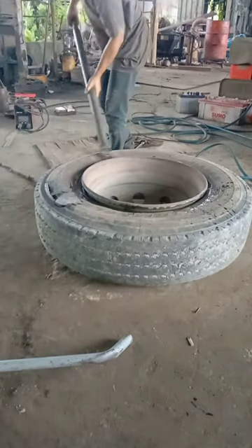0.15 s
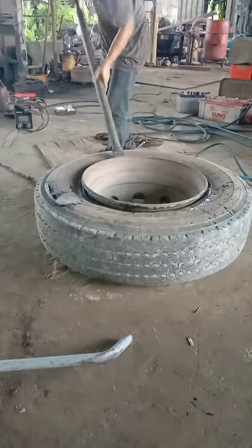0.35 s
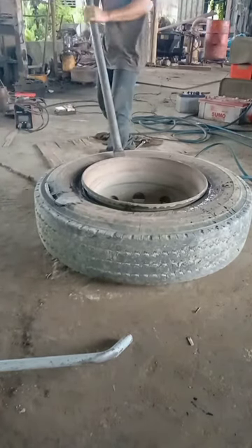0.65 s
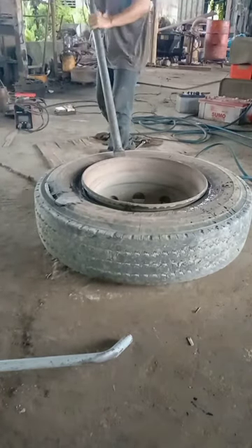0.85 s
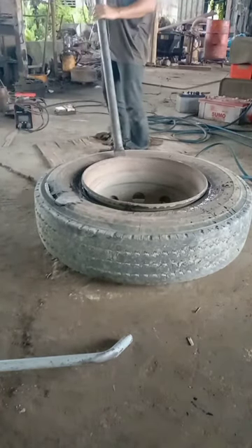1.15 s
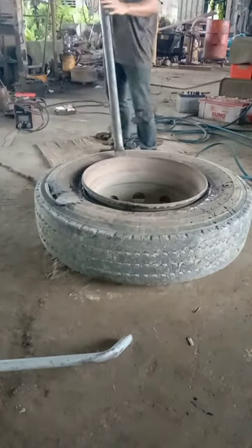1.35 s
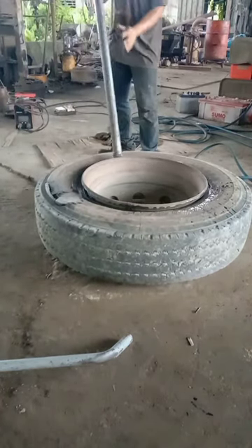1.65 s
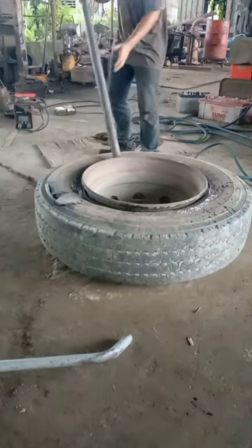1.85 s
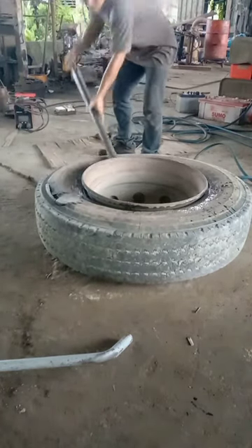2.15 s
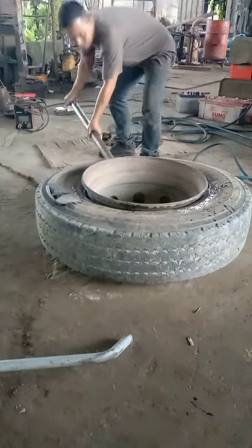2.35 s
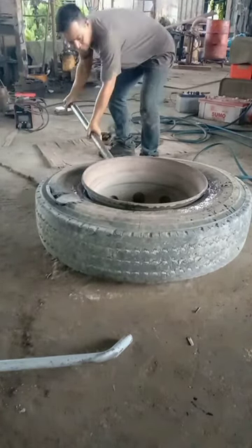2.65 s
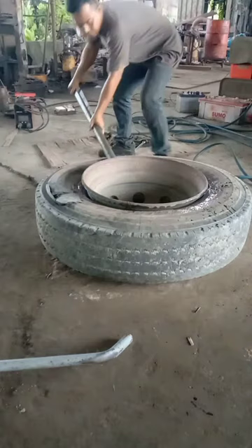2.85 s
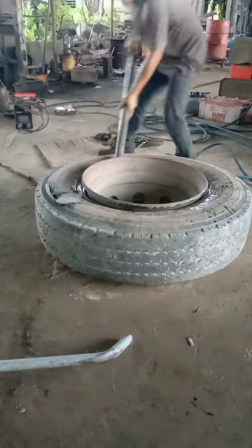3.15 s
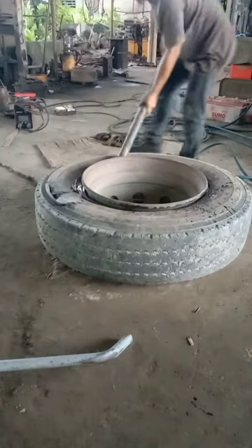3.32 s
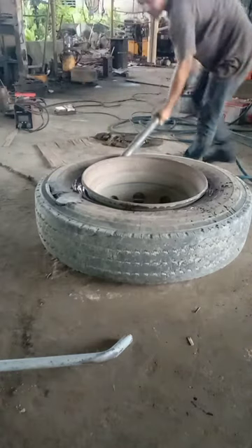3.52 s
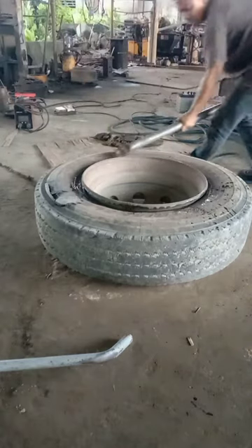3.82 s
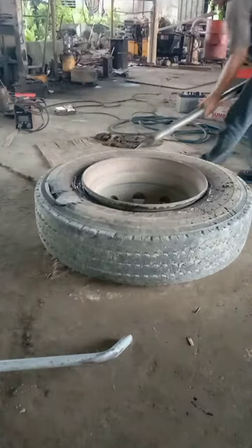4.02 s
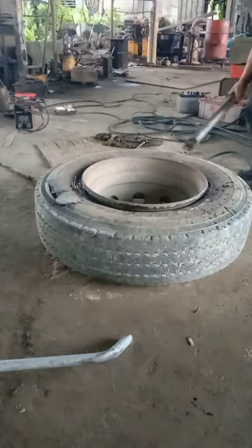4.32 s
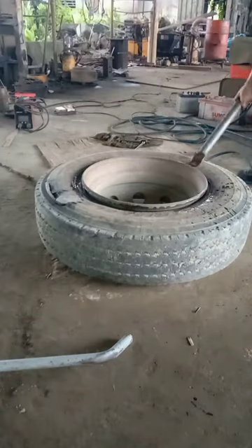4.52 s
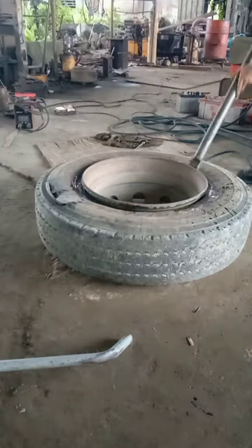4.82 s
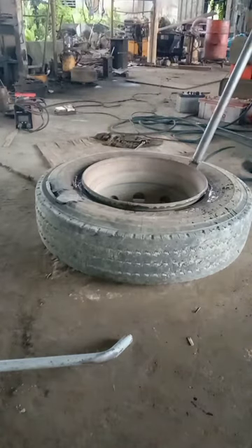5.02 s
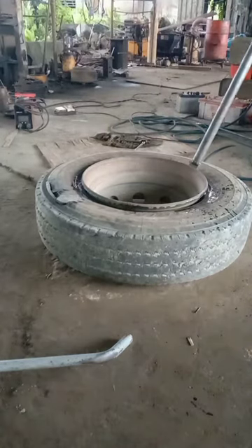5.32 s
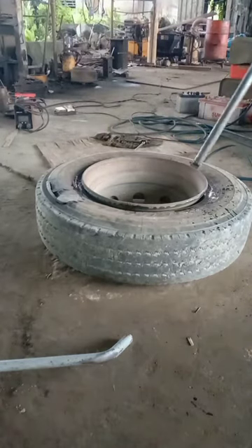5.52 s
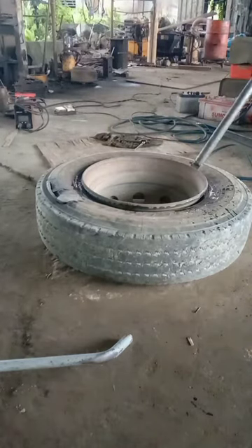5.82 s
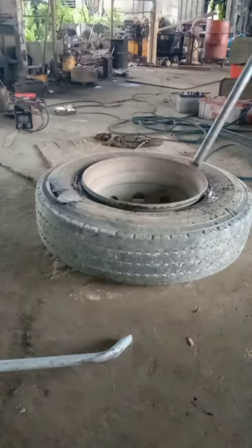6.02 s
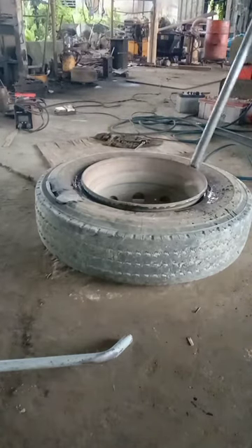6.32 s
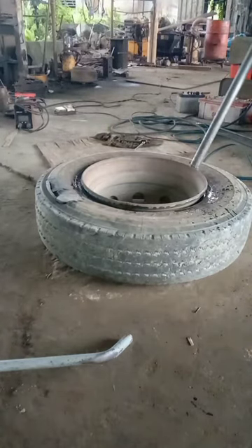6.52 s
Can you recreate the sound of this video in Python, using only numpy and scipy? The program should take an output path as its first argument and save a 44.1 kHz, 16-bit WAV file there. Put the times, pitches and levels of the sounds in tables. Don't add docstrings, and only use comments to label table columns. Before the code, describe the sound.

Spaced hard clangs of a steel lever on a wheel rim, rubber thumps beneath, faint insects and distant bird chirps between the blows.

```python
import sys
import numpy as np
from scipy import signal
from scipy.fft import rfft, irfft, next_fast_len
from scipy.io import wavfile
from scipy.ndimage import uniform_filter1d

SR = 44100
rng = np.random.default_rng(int(sys.argv[2]) if len(sys.argv) > 2 else 0)


def gain_from_decibels(decibels):
    exponent = np.asarray(decibels, float) / 20
    return 10 ** exponent


def master_out(mix):
    frames = np.transpose(np.atleast_2d(mix))
    ceiling = np.clip(frames, -1, 1)
    pcm = np.round(ceiling * 32767).astype(np.int16)
    wavfile.write(sys.argv[1], SR, pcm)


N = 294129
LONG = SR * 2 // 3


def unit(x):
    return x / np.sqrt(np.mean(x ** 2) + 1e-20)


def along(points, hz):
    f, v = np.transpose(points)
    return np.interp(np.log(hz + 1), np.log(f + 1), v)


def rush(spectrum, holes_db):
    hz, _, z = signal.stft(rng.standard_normal(N), SR, nperseg=2048)
    field = rng.standard_normal(z.shape)
    for _ in range(2):
        field = uniform_filter1d(field, size=6, axis=0)
        field = uniform_filter1d(field, size=5, axis=1)
    depth_db = holes_db * np.clip(unit(field) + 2.04, 0, None)
    z = z * gain_from_decibels(along(spectrum, hz)[:, None] - depth_db)
    return unit(signal.istft(z, SR, nperseg=2048)[1][:N])


def outside():
    # t/s, level/dB
    let_through = [(0.0, -34), (0.39, -39), (0.59, -34), (0.72, -38), (1.21, -40.5), (1.75, -38.5),
                   (1.88, -20.5), (2.1, -33.5), (2.69, -39.5), (3.14, -37), (3.64, -42.5), (3.99, -37.5),
                   (4.35, -41), (5.0, -34.5), (5.54, -43.5), (5.98, -34), (6.41, -35.5), (6.6, -16.5)]
    # f/Hz, spectral density/dB
    hiss = [(2060, -32), (2750, -28), (3200, -19), (4000, -25), (4550, -5.5), (4850, -3.5), (5150, 5),
            (5450, -1.5), (5900, -5.5), (6180, -17), (6500, -9.5), (7000, -18), (7480, -22), (7800, -19),
            (10400, -29), (11100, -41), (14900, -42), (16000, -38)]
    # f/Hz, spectral density/dB
    murmur = [(30, -26), (97, -7.5), (144, -8), (337, -11), (740, -7), (1010, -7.5), (1350, 3), (1560, 2),
              (2120, -10), (3140, -11.5), (3950, -21), (4200, -3), (5460, -55), (9240, -120)]
    insects_db = np.interp(np.arange(N) / SR, *np.transpose(let_through))
    wash_db = -54 + 1.74 * np.clip(insects_db + 35.5, 0, None)
    insects = rush(hiss, holes_db=4)
    wash = rush(murmur, holes_db=4.5)
    return gain_from_decibels(insects_db) * insects + gain_from_decibels(wash_db) * wash


def wobble(rate, count, size):
    knots = rng.standard_normal((count, int(size * rate / SR) + 2))
    position = np.arange(size) * rate / SR
    return np.array([np.interp(position, np.arange(len(k)), k) for k in knots])


def ringing(modes, damping, rough_db):
    t = np.arange(LONG) / SR
    hz, level_db, t60 = np.transpose(modes)[:, :, None]
    flutter = rough_db * wobble(22.5, count=len(modes), size=LONG)
    drift = 0.55 * wobble(30, count=len(modes), size=LONG)
    decay_db = 60 * t * (1 / t60 + damping)
    envelope = gain_from_decibels(np.float32(level_db + flutter - decay_db))
    ring = np.sum(envelope * np.sin(np.float32(2 * np.pi * hz * t + drift)), axis=0)
    return ring / np.linalg.norm(ring[:SR // 10])


def gated(after):
    t = np.arange(LONG) / SR
    fade_out = np.clip((LONG / SR - t) / 0.05, 0, 1)
    return (0.02 + 1 / (1 + (t / after) ** 9)) * fade_out


def dying(layers, size):
    hz, t, z = signal.stft(rng.standard_normal(size + 512), SR, nperseg=512)
    power = 0
    for spectrum, decay, db, lasts in layers:
        t60 = np.abs(along(decay, hz))[:, None]
        gain = gain_from_decibels(along(spectrum, hz)[:, None] - 60 * t / t60)
        gate = 1 + (t / lasts) ** 9
        power = power + (gain_from_decibels(db) * gain / np.linalg.norm(gain[:, 1:]) / gate) ** 2
    tail = signal.istft(z * np.sqrt(power), SR, nperseg=512)[1][256:256 + size]
    tail = tail * np.clip(np.arange(size) / (0.00068 * SR), 0, 1)
    return tail / np.linalg.norm(tail) * np.sqrt(power[:, 1:].sum())


def clatter(colour, thud_db, rattle, crack_db=0, thud_lasts=1):
    # f/Hz, t60/s
    clang_decay = [(100, 0.53), (400, 0.63), (1500, 0.63), (4000, 0.8), (8000, 0.59), (15000, 0.35)]
    # f/Hz, t60/s
    crack_decay = [(100, 0.1), (1500, 0.077), (6000, 0.057), (15000, 0.01)]
    # f/Hz, spectral density/dB
    thud = [(29, -46), (50, -4), (75, 4.5), (118, 2), (156, 10.5), (274, -10.5), (426, 1), (543, -33),
            (700, -4), (1540, -120)]
    # f/Hz, t60/s
    thud_decay = [(60, 0.071), (160, 0.39), (400, 0.7), (800, 0.13)]
    # f/Hz, level/dB, t60/s
    carcass = [(156.7, 0, 0.45)]
    layers = [(colour, clang_decay, 0, 10),
              (colour, crack_decay, crack_db, 10),
              (thud, thud_decay, thud_db, thud_lasts)]
    response = dying(layers, size=LONG)
    tyre_mode = ringing(carcass, damping=0.11, rough_db=5.5) * gated(thud_lasts)
    response = response + gain_from_decibels(thud_db - 5.5) * tyre_mode
    t = np.arange(SR // 5) / SR
    contacts = gain_from_decibels(3.9 * wobble(398, count=1, size=len(t))[0])
    chatter = contacts * rng.standard_normal(len(t)) * np.exp(-(t / rattle) ** 2)
    chatter = chatter / np.linalg.norm(chatter) + 0.43 * (t == 0)
    return signal.fftconvolve(response, chatter / np.linalg.norm(chatter))[:LONG]


def touches():
    # t/s, peak level/dB, centre f/Hz, thud level/dB
    jolts = [
        (0.002, -33, 2443, -27),
        (1.871, -9, 1450, -4),
        (1.949, -12.5, 2523, 4),
        (3.796, -20.5, 3250, -3),
    ]
    taps = [
        (0.045, -44, 900, -23),
        (0.1, -39, 1226, -21),
        (0.286, -40, 1040, -30),
        (2.085, -22, 1420, -17),
        (2.259, -27.5, 1450, -6),
        (2.28, -30.5, 938, -26),
        (2.366, -25.5, 1480, -16),
        (2.378, -23.5, 2900, -24),
        (5.212, -36.5, 1350, -10),
        (6.308, -31, 2330, -6),
    ]
    scrapes = [
        (0.225, -36, 1480, -23),
        (1.603, -17, 2730, 2),
        (3.765, -24, 2620, -11),
        (5.446, -27, 3830, -9),
    ]
    knocks = [
        (2.32, -29, 165, -22),
        (3.265, -30.5, 219, -20),
        (4.53, -34.5, 393, -22),
        (5.841, -44, 170, -25),
        (6.412, 3, 135, -20),
    ]
    # table, rattle length/s, t60/s
    kinds = [(jolts, 0.026, 0.58), (taps, 0.026, 0.48), (scrapes, 0.1, 0.77), (knocks, 0.056, 0.22)]
    out, t = np.zeros(N + SR), np.arange(LONG) / SR
    for table, rattle, t60 in kinds:
        for s, db, hz, thud_db in table:
            colour = [(hz / 3, -30), (hz / 1.3, -13), (hz / 1.06, -9), (hz, 0),
                      (hz * 1.06, -9), (hz * 1.6, -13), (hz * 4, -35)]
            tone = ringing([(hz, 0, 3)], damping=0.27, rough_db=5.0)
            tone = gain_from_decibels(-3) * tone * np.clip(t / rattle, 0, 1)
            envelope = gain_from_decibels(db + 20.5 - 60 * t / t60)
            out[round(s * SR):][:LONG] += envelope * (clatter(colour, thud_db, rattle) + tone)
    return out[:N]


def wheel(x):
    # centre f/Hz, bandwidth/Hz
    resonances = [(764, 100), (974, 95), (1220, 28), (1560, 68), (1810, 31), (2040, 32), (2520, 47),
                  (3050, 33), (3630, 31), (4150, 36), (4910, 34), (5300, 38), (5450, 26), (5670, 71),
                  (5970, 63), (6120, 15), (6330, 26), (6830, 65), (7100, 23), (7240, 15), (7350, 90),
                  (7900, 52), (8620, 54)]
    lifts = [-1.4, 1, -2.1, -0.55, -1.3, 0.5, 0.4, 0.3, -5.5, 2, 2, 1.2, -1.5, 0.2, -1.2, 0.1, -1, -1, -7,
             2, -3.3, 3, 2]
    size = next_fast_len(N + SR // 10)
    hz = np.arange(size // 2 + 1) * SR / size
    peaks = 0
    for k, (centre, width) in enumerate(resonances):
        spread = 1j * hz * width
        peaks = peaks + (-1) ** k * gain_from_decibels(lifts[k]) * spread / (centre * centre - hz * hz + spread)
    crowd_width = 30
    for k, centre in enumerate(np.sort(rng.uniform(6400, 15600, size=70))):
        near = slice(*np.searchsorted(hz, centre + np.array([-20, 20]) * crowd_width))
        spread = 1j * hz[near] * crowd_width
        peaks[near] += (-1) ** k * spread / (centre * centre - hz[near] ** 2 + spread)
    response = 0.42 + 1.3 * peaks
    return irfft(rfft(x, size) * response, size)[:N]


def whistles(table):
    out = np.zeros(N)
    for s, length, hz, db in table:
        t = np.arange(round(length * SR)) / SR
        waver = 1.1 * wobble(79, count=1, size=len(t))[0]
        swell = np.sin(np.pi * t / length)
        out[round(s * SR):][:len(t)] += gain_from_decibels(db + 7) * swell * np.sin(2 * np.pi * hz * t + waver)
    return out


def rubbing():
    # t/s, length/s, f/Hz, level/dB
    rubs = [
        (.04, .09, 920, -48),
        (.09, .08, 1200, -48),
        (.08, .05, 2230, -55),
        (.225, .07, 1480, -46),
        (.29, .06, 1070, -51),
        (.28, .04, 880, -53),
        (2.26, .07, 1000, -48),
        (5.27, .06, 2250, -52),
    ]
    return whistles(rubs)


def tyre_air():
    # t/s, level/dB, hold/s
    shoves = [(0.065, -43.5, 0.039), (0.46, -40, 0.14), (1.647, -20.5, 0.064), (1.856, -34.5, 0.17),
              (2.104, -50.5, 0.12), (2.3, -42, 0.012), (3.727, -55, 0.03), (3.85, -34, 0.098),
              (4.754, -33, 0.18), (5.127, -39.5, 0.018), (5.29, -55.5, 0.055), (5.595, -46, 0.019),
              (5.828, -40, 0.023), (6.364, -31, 0.07), (6.517, -31, 0.15)]
    t = np.arange(N) / SR
    drift = uniform_filter1d(3 * wobble(13, count=2, size=N), size=2000)
    boom = np.sin(2 * np.pi * 66 * t + drift[0]) + gain_from_decibels(1) * np.sin(2 * np.pi * 85 * t + drift[1])
    level = gain_from_decibels(-71)
    for s, db, hold in shoves:
        rise_db = 1100 * np.clip(s - t, 0, 1)
        fall_db = 246 * np.clip(t - s - hold, 0, 1)
        level = level + gain_from_decibels(db - rise_db - fall_db)
    return level * unit(boom)


def blows(table, modes, colour, damping, ring_lasts, clang_lasts, crack_db, thud_lasts):
    out, t = np.zeros((2, N + SR)), np.arange(LONG) / SR
    for s, db, ring_db, thud_db, rattle in table:
        build_up = 1 - np.exp(-t / (0.091 * rattle))
        ring = gain_from_decibels(ring_db) * ringing(modes, damping, rough_db=3) * build_up * gated(ring_lasts)
        clang = clatter(colour, thud_db, rattle, crack_db, thud_lasts) * gated(clang_lasts)
        out[:, round(s * SR):][:, :LONG] += gain_from_decibels(db + 21.0) * np.array([ring, clang])
    return out[:, :N]


def seated_blow():
    # t/s, peak level/dB, ring level/dB, thud level/dB, rattle length/s
    strikes = [
        (0.45, -2.26, -12, 1, 0.0055),
        (0.473, -5, -4, -21, 0.0065),
    ]
    pitches = [1012, 1211, 1440, 1635, 1814, 1954, 2121, 2514, 3063, 3445, 3736, 4320, 5146, 5421, 6810,
               7445, 8624]
    # level/dB, t60/s of each pitch
    decays = [(3, 0.19), (-2, 0.23), (7, 0.18), (0, 0.18), (-8, 0.81), (-10, 0.95), (0, 0.35), (-7, 0.81),
              (-6, 1), (-5, 0.5), (-10, .6), (0, 0.18), (1, 0.33), (-10, .25), (-22, .55), (-10, .15),
              (-27, .5)]
    # f/Hz, spectral density/dB
    colour = [(180, -42), (300, 3), (425, 2), (678, -30.5), (961, -2.5), (1100, -0.5), (1460, 1),
              (2140, -4.5), (2250, -2), (2800, -4), (3360, 4), (4520, -18.5), (5250, -6), (12500, -38),
              (15000, -31)]
    modes = np.column_stack([pitches, decays])
    return blows(strikes, modes, colour, 0.1, 0.43, 0.3, crack_db=1.5, thud_lasts=0.3)


def hard_blow():
    # t/s, peak level/dB, ring level/dB, thud level/dB, rattle length/s
    strikes = [
        (1.622, -1.5, -0.5, -8.5, 0.021),
        (1.641, -3.5, -2.5, -21, 0.025),
    ]
    pitches = [759, 1295, 1440, 1589, 1802, 2266, 2527, 3208, 3460, 4145, 4740, 4917, 5201, 5650, 5970,
               6331, 6851, 7241, 7978, 8689, 9440, 10680]
    # level/dB, t60/s of each pitch
    decays = [(-17, 2.2), (-11.5, .35), (-3, 1.4), (-12, 1.05), (-10.5, 0.41), (-7.5, .6), (-15, 0.66),
              (-24.5, 2.3), (-17, 2.3), (-11, 0.33), (-4, 0.36), (-8, .4), (-10, 2.4), (-10, 1.1),
              (-14, .5), (2.5, 0.44), (0, .2), (4, 0.17), (-19, .9), (-14, 0.77), (-22, 0.48),
              (-28.5, 0.69)]
    # f/Hz, spectral density/dB
    colour = [(180, -4.5), (300, 0.5), (528, -13.5), (762, -10), (1320, -7), (1780, -6.5), (2360, -8.5),
              (3130, -2.5), (4440, -12.5), (5340, -2), (9090, -22), (12900, -27), (14700, -17)]
    modes = np.column_stack([pitches, decays])
    return blows(strikes, modes, colour, 0.52, 0.54, 0.56, crack_db=1.2, thud_lasts=0.7)


def slip():
    # t/s, peak level/dB, ring level/dB, thud level/dB, rattle length/s
    strikes = [
        (3.838, -8, -16, -21, 0.014),
        (3.854, -2, -7.5, -12, 0.0043),
    ]
    pitches = [720, 1012, 1211, 1588, 1836, 2024, 2476, 3079, 3384, 3634, 4253, 5265, 5394, 5609, 6105,
               6804, 7434]
    # level/dB, t60/s of each pitch
    decays = [(-1, 0.46), (2, .25), (3, 3), (1, 1.8), (3.5, 0.39), (-5, 0.47), (7.5, 0.51), (4, .55),
              (-2, 0.6), (2, .28), (0.5, 0.72), (3, 0.81), (-1, .9), (-7, .7), (-1, 0.29), (-4, 0.67),
              (2, .27)]
    # f/Hz, spectral density/dB
    colour = [(180, -28), (300, -3), (425, 1), (600, -20), (800, -5), (1050, 1), (1460, -6), (2140, -3),
              (2750, -2.5), (3260, 3), (4400, -19), (5250, -5), (12500, -35), (15000, -26)]
    modes = np.column_stack([pitches, decays])
    return blows(strikes, modes, colour, 0.028, 0.95, 0.32, crack_db=0.4, thud_lasts=0.3)


def glancing_blow():
    # t/s, peak level/dB, ring level/dB, thud level/dB, rattle length/s
    strikes = [
        (4.651, -6, -3.5, -45, 0.041),
        (4.674, -7.5, -24, -40, 0.033),
    ]
    # f/Hz, level/dB, t60/s
    modes = [(1437, -5, 0.95), (2133, -1, 0.19), (2900, -8, 0.46), (3270, -6.5, 0.38), (3840, -17, 0.23),
             (6870, -1, 0.41), (7500, -1, 0.06), (7900, -12, 0.27), (9100, -16, 0.52), (10940, -10, 0.14)]
    # f/Hz, spectral density/dB
    colour = [(180, -70), (300, -28), (774, -16), (1190, -13.5), (1460, 2.5), (1810, -54), (2100, 5.5),
              (2440, -18), (3130, -2.5), (4590, -19), (5520, 4), (6520, -10), (16000, -33)]
    return blows(strikes, modes, colour, 0.91, 0.29, 0.77, crack_db=1.2, thud_lasts=0.7)


def deep_blow():
    # t/s, peak level/dB, ring level/dB, thud level/dB, rattle length/s
    strikes = [
        (4.749, -3.5, -1.3, 1.5, 0.0086),
        (4.771, -6, -2, -11.5, 0.011),
    ]
    # f/Hz, level/dB, t60/s
    modes = [(1170, -3, 0.18), (1420, 0.5, 0.4), (1600, -12, 0.36), (1690, 0, 0.31), (1970, -1.5, 0.69),
             (2044, 9.5, 0.25), (2525, 1, 0.75), (2680, -10, 0.54), (3160, -18, 0.14), (3060, -6, 0.36),
             (3160, 1.5, 0.64), (3420, -4, 0.55), (3644, -25, 0.13), (3980, -3, 0.22)]
    # f/Hz, spectral density/dB
    colour = [(180, -35), (300, 4.5), (410, -1), (580, -28.5), (961, -2), (1100, 0), (1460, 0), (2140, 4),
              (2800, -2.5), (3460, 3), (4400, -23), (5250, -6.5), (12500, -34), (15000, -29)]
    return blows(strikes, modes, colour, 0.15, 0.91, 0.97, crack_db=0.7, thud_lasts=0.32)


def edge_blow():
    # t/s, peak level/dB, ring level/dB, thud level/dB, rattle length/s
    strikes = [
        (5.531, -5.5, -0.5, -44, 0.0011),
        (5.559, -9, -6, -22, 0.0067),
    ]
    pitches = [1012, 1440, 1577, 2024, 2439, 2552, 3042, 3241, 3639, 3741, 4344, 4840, 5997, 6331, 6851,
               7994]
    # level/dB, t60/s of each pitch
    decays = [(-12, 0.41), (2, .25), (-12, .6), (-18, .6), (-10, .45), (-19, .6), (-0.5, 0.51), (-9, 0.46),
              (-2, 0.36), (-11, .3), (-12, .4), (-17, .5), (8, .09), (-3, 0.21), (4, .09), (-9, 0.13)]
    # f/Hz, spectral density/dB
    colour = [(180, -57), (300, -28), (420, -22), (584, -36), (700, -24), (1300, -15.5), (1430, -3.5),
              (2280, -13.5), (2480, -10), (2840, -12), (3130, -4), (4590, -17.5), (6100, -9),
              (12500, -48.5), (15000, -41)]
    modes = np.column_stack([pitches, decays])
    return blows(strikes, modes, colour, 0.23, 0.28, 0.45, crack_db=1.5, thud_lasts=0.3)


def lip_blow():
    # t/s, peak level/dB, ring level/dB, thud level/dB, rattle length/s
    strikes = [
        (5.794, -1.5, -4.5, -16, 0.0035),
    ]
    pitches = [738, 1211, 1550, 1814, 1949, 2024, 2503, 3042, 3241, 3375, 3892, 5173, 5663, 6869, 7424]
    # level/dB, t60/s of each pitch
    decays = [(-1, 0.4), (1, 0.68), (8, 0.17), (-6, 0.91), (7, .25), (-2, 0.88), (-11, .64), (3, 0.55),
              (-4, .7), (-6, 1.2), (-7, 0.6), (-5.5, 1.2), (-8, 0.85), (-14, .8), (-4, 0.55)]
    # f/Hz, spectral density/dB
    colour = [(180, -55), (300, -28), (430, -17), (560, -34), (720, -16), (946, -14), (1140, -4),
              (1230, -4), (1900, 0.5), (2790, -12), (3130, -2), (4590, -14), (5080, -3), (7690, -20.5),
              (12800, -34.5), (15000, -26)]
    modes = np.column_stack([pitches, decays])
    return blows(strikes, modes, colour, 0.31, 0.63, 0.73, crack_db=1.5, thud_lasts=0.27)


def slam():
    # t/s, peak level/dB, ring level/dB, thud level/dB, rattle length/s
    strikes = [
        (6.375, -1.8, -0.5, -4.5, 0.0044),
        (6.398, -1.5, -12, -4.5, 0.018),
        (6.432, -8, -16, 1, 0.0036),
    ]
    pitches = [720, 1211, 1448, 1588, 1798, 2127, 3049, 3628, 4151, 4743, 5173, 5303, 5453, 5674, 5970,
               6331, 7235, 7892, 8619]
    # level/dB, t60/s of each pitch
    decays = [(-12, 0.49), (-17, 13), (-6, 0.77), (-18, 5), (-12, 0.86), (-8.5, .65), (-2, .4), (-7, .55),
              (-7, 0.55), (-16, 1.5), (-7, .7), (-9, .85), (-3, 0.26), (-9, 0.71), (-6, 0.55), (-2, .55),
              (-5, .22), (-18, 1.2), (-18, 0.75)]
    # f/Hz, spectral density/dB
    colour = [(180, -10.5), (400, -9.5), (600, -16), (762, -9), (1320, -8.5), (1780, -7), (2360, -9),
              (3130, -1.5), (4440, -13), (5340, -2.5), (9090, -26.5), (12900, -29), (14700, -21)]
    modes = np.column_stack([pitches, decays])
    return blows(strikes, modes, colour, 0.11, 0.9, 0.9, crack_db=2.0, thud_lasts=0.033)


def lever():
    loud = gain_from_decibels(21.0) * (hard_blow() + slam())
    moderate = seated_blow() + slip() + glancing_blow() + deep_blow() + edge_blow() + lip_blow()
    ring, clang = loud + moderate
    return ring + wheel(clang + touches())


def birds():
    # t/s, length/s, f/Hz, level/dB
    chirps = [
        (2.62, .07, 3250, -60),
        (2.87, 0.054, 3270, -61),
        (2.95, 0.054, 3000, -59),
        (3.07, .08, 3400, -57),
        (3.17, .05, 3000, -60),
        (3.29, 0.08, 3170, -52),
        (1.02, .08, 3060, -57),
        (1.57, 0.034, 3040, -50),
    ]
    return whistles(chirps)


def scene():
    return (outside() + rubbing() + tyre_air() + lever() + birds())[None]


def low_pass(x):
    return signal.sosfilt(signal.butter(12, 16630, fs=SR, output="sos"), x)


def record(dry):
    # t/s, depth/dB, plateau/s, recovery/s
    ducks = [
        (1.597, -21, 0.14, 0.36),
        (6.357, -21, 0.044, 0.88),
    ]
    t, gain_db = np.arange(N) / SR, np.zeros(N)
    for s, depth_db, plateau, recovery in ducks:
        gain_db += depth_db * (t > s) * np.clip(1 - (t - s - plateau) / recovery, 0, 1)
    x = signal.sosfilt(signal.butter(7, 60, "high", fs=SR, output="sos"), dry)
    x = x * uniform_filter1d(gain_from_decibels(gain_db), size=64)
    x = x / (1 + np.abs(x / 0.9) ** 4) ** (1 / 4)
    size = next_fast_len(N)
    treble_db = -34 * (np.fft.rfftfreq(size, 1 / SR) > 15700)
    x = irfft(rfft(x, size) * gain_from_decibels(treble_db), size)[:, :N]
    return low_pass(x)


dry = scene()
out = record(dry)
master_out(out)
```